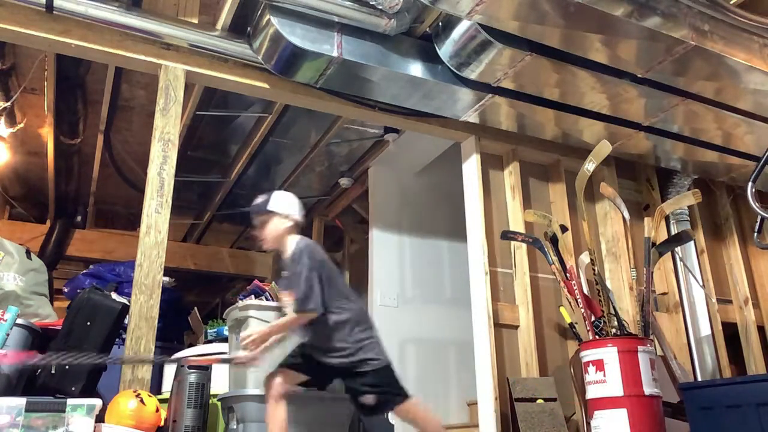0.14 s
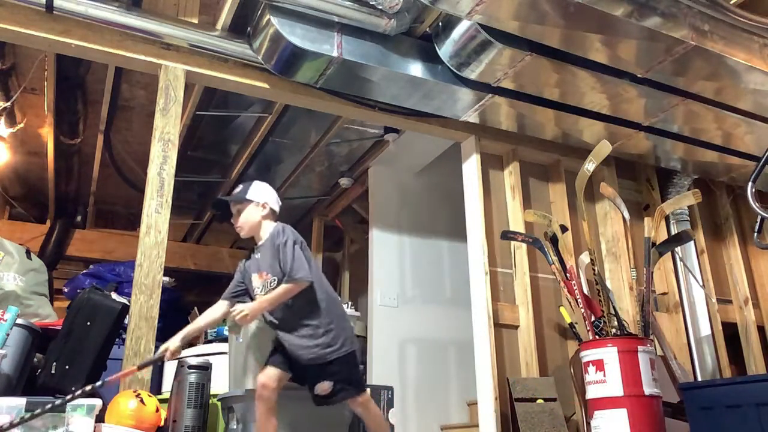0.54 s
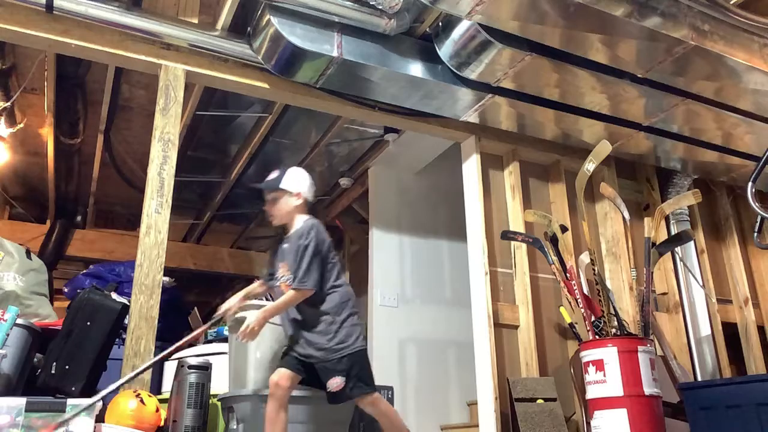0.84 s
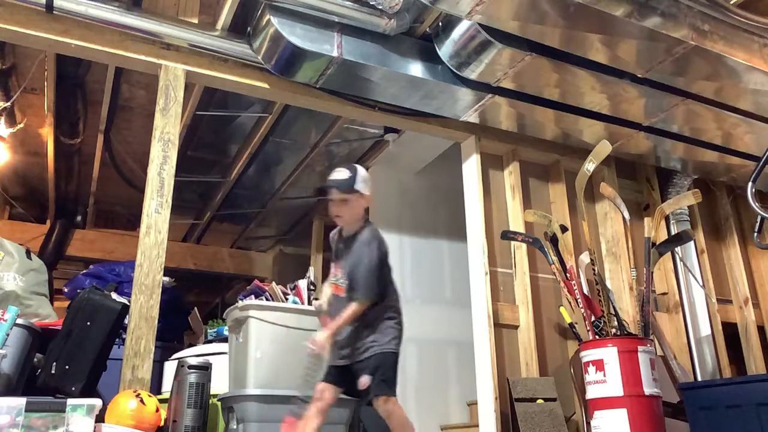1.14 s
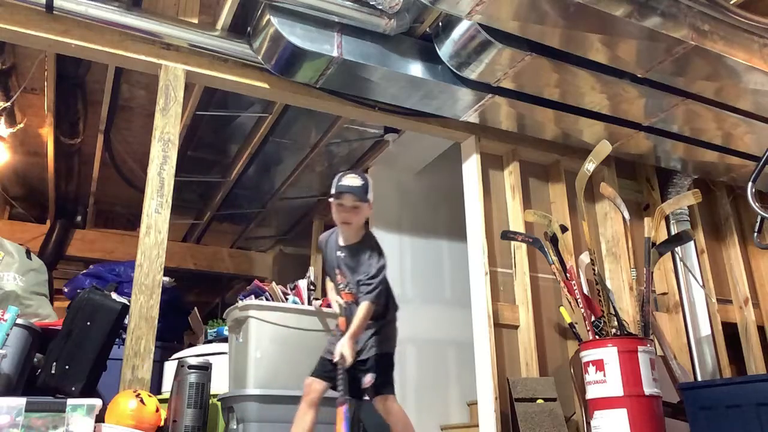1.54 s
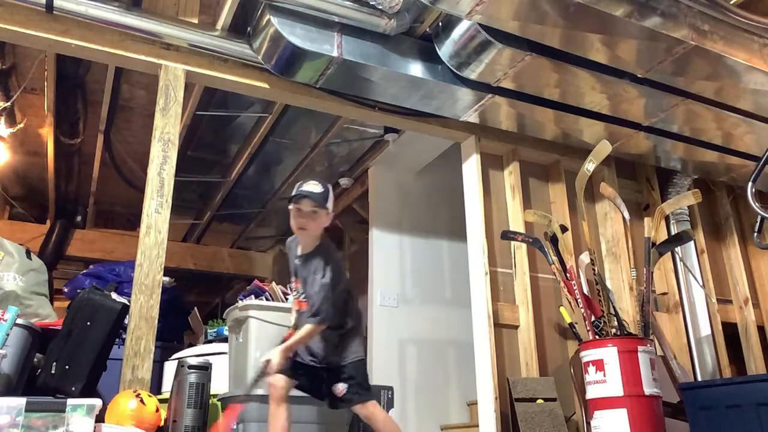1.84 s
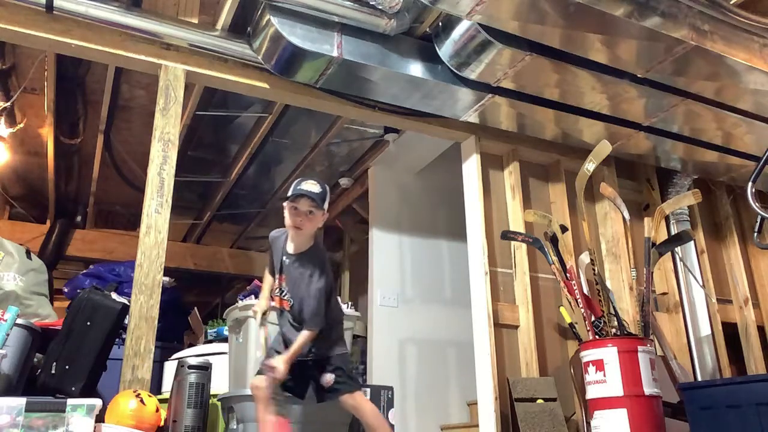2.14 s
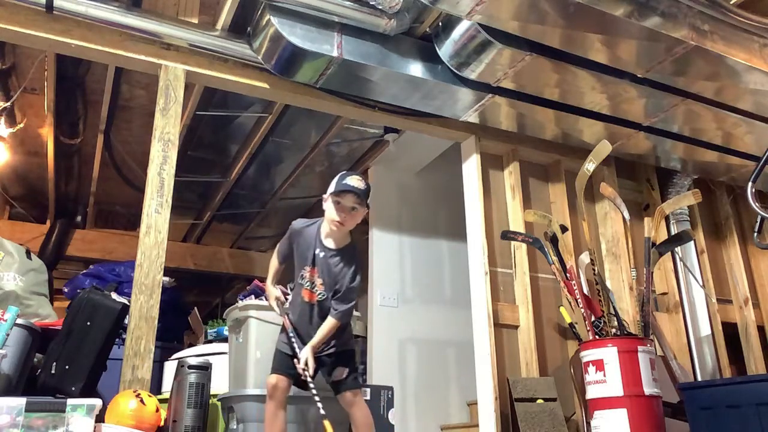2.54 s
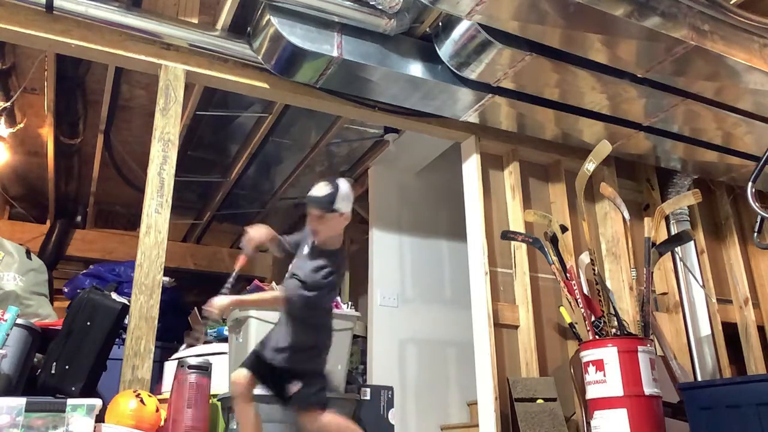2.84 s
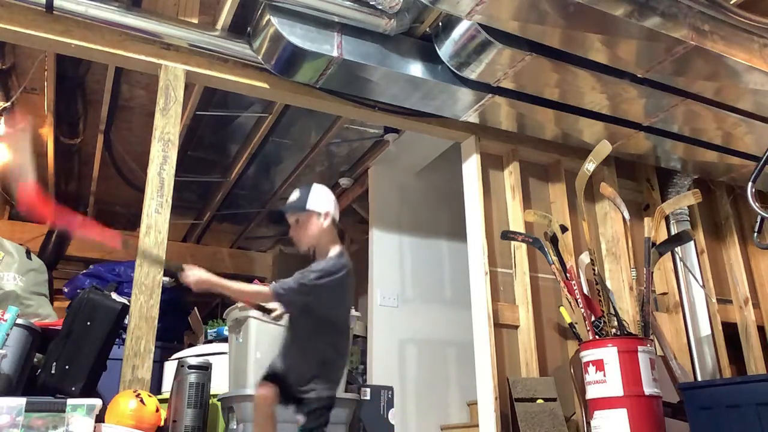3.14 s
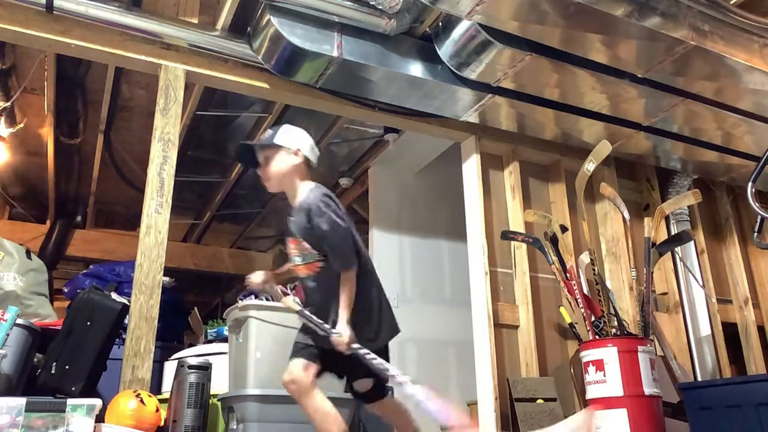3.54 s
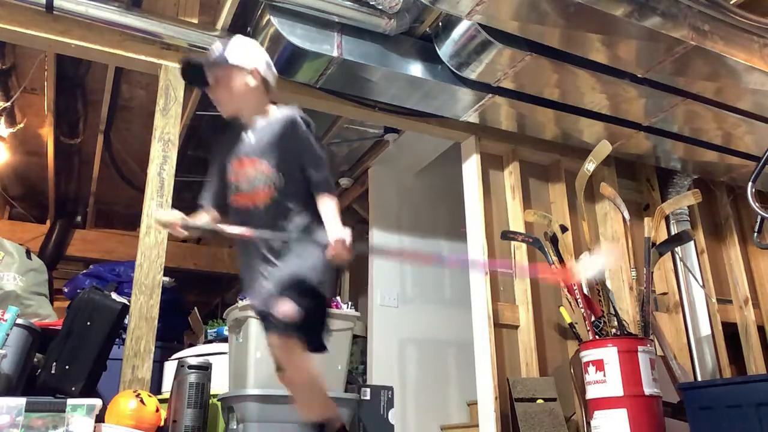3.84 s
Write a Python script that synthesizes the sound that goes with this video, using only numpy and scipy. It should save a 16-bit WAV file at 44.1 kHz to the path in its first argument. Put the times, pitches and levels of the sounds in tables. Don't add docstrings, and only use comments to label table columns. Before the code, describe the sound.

A hockey stick slaps a puck on a concrete floor, close up, with small taps and shoe scuffs between; later one hard shot cracks and rings a metal post. Bright short echoes, faint hum.

```python
import sys
import numpy as np
from scipy import signal
from scipy.io import wavfile
from scipy.ndimage import uniform_filter1d, minimum_filter1d

SR = 44100
rng = np.random.default_rng(int(sys.argv[2]) if len(sys.argv) > 2 else 0)


def gain_from_db(level_db):
    decades = np.asarray(level_db, float) / 20
    return 10 ** decades


def to_wav(sig):
    pcm = np.clip(np.atleast_2d(sig), -1, 1) * 32767
    pcm = np.round(pcm).astype(np.int16)
    wavfile.write(sys.argv[1], SR, pcm.T)


N = 176400
TAIL = 30000


def evened(x):
    return x / np.sqrt(np.mean(x ** 2) + 1e-20)


def read(points, hz):
    f, value = np.transpose(points)
    return np.interp(np.log(hz + 1), np.log(f + 1), value)


def add(mix, start_s, sound):
    part = mix[round(start_s * SR):][:len(sound)]
    part += sound[:len(part)]


def tilt(hz, bright_db):
    pivot_hz = 3300
    return bright_db * np.tanh(2 * np.log2((hz + 1) / pivot_hz))


def colour(points, bright_db):
    hz = np.fft.rfftfreq(2048, 1 / SR)
    log_gain = np.log(gain_from_db(np.maximum(read(points, hz) + tilt(hz, bright_db), -90)))
    mirrored = np.r_[log_gain, log_gain[-2:0:-1]]
    h = np.fft.ifft(np.exp(np.conj(signal.hilbert(mirrored)))).real[:1024]
    return h / np.linalg.norm(h)


def rings(modes, scatter_db):
    t = np.arange(TAIL) / SR
    total = np.zeros(TAIL)
    for mode_hz, mode_db, t60_s in modes:
        level_luck, pitch_luck = rng.random(2)
        decay = gain_from_db(mode_db + scatter_db * (2 * level_luck - 1) - 60 * t / t60_s)
        sung_hz = mode_hz * (1 + 0.0056 * (pitch_luck - .5))
        total += decay * np.sin(2 * np.pi * sung_hz * t)
    return total


def house_air():
    # pitch_hz, level_db (per Hz)
    air_curve = [(15, -46), (25, -37), (123, 2), (451, -4.5), (531, -8), (1890, -21), (5000, -18.5),
                 (6560, -13.5), (16000, -27.5)]
    # pitch_hz, level_db
    hum_tones = [(120, -58)]
    air_db, patch_db, top_hz = -51, 2.5, 9000
    frames, hz, t = N // 512 + 5, np.fft.rfftfreq(2048, 1 / SR), np.arange(N) / SR
    a, b, patches = rng.standard_normal((frames, 1025, 3)).T
    patches = uniform_filter1d(uniform_filter1d(patches, size=10, axis=0), size=6, axis=1)
    gain = gain_from_db(read(air_curve, hz)[:, None] + patch_db * evened(patches))
    z = (a + 1j * b) * gain / (1 + (hz[:, None] / top_hz) ** 6)
    hiss = signal.istft(z, nperseg=2048, noverlap=1536)[1][:N]
    hum = sum(gain_from_db(tone_db + 1) * np.sin(2 * np.pi * tone_hz * t) for tone_hz, tone_db in hum_tones)
    return gain_from_db(air_db) * evened(hiss) + hum


def fan_drone():
    drone_hz, width_hz, drone_db = 63, 9.8, -63
    slow = signal.lfilter(*signal.butter(2, width_hz, fs=SR), rng.standard_normal((2, N)))
    carrier = np.exp(2j * np.pi * drone_hz * np.arange(N) / SR)
    return gain_from_db(drone_db) * evened(((slow[0] + 1j * slow[1]) * carrier).real)


def garage():
    # pitch_hz, t60_s
    room_decay = [(200, 0.47), (1000, 1), (3000, 0.85), (6500, 0.74), (12000, 0.5)]
    build_s, early_db, early_t60_s = 0.0032, 7, 0.47
    wall_s, wall_db, wall_bright_db = .019, 7, 6
    wall_spread_s, wall_stop_s = .004, .002
    lumps_db = 1.5
    hz, times, z = signal.stft(rng.standard_normal((2, TAIL)), SR, nperseg=256)
    z[0] *= gain_from_db(-60 * times / read(room_decay, hz)[:, None])
    z[1] *= gain_from_db(tilt(hz, wall_bright_db))[:, None]
    tail, burst = signal.istft(z, SR, nperseg=256)[1][:, :TAIL]

    t = np.arange(TAIL) / SR
    tail = tail * (1 - np.exp(-t / build_s)) * (1 + gain_from_db(early_db - 60 * t / early_t60_s))
    spread = np.where(t < wall_s, wall_spread_s, wall_stop_s)
    swell = np.exp(-.5 * ((t - wall_s) / spread) ** 2)
    h = tail + gain_from_db(wall_db) * burst * swell
    lumps = evened(uniform_filter1d(rng.standard_normal(TAIL), size=90))
    h = h * gain_from_db(lumps_db * lumps)
    return h / np.linalg.norm(h)


def footfall(level_db, pitch_hz):
    t60_s, rise_s, trim_db = 0.27, 0.0044, -9
    t = np.arange(TAIL // 2) / SR
    band = signal.butter(1, [pitch_hz * 0.55, pitch_hz * 0.86], "band", fs=SR)
    low = signal.lfilter(*band, rng.standard_normal(len(t)))
    return gain_from_db(level_db + trim_db - 60 * t / t60_s) * (1 - np.exp(-t / rise_s)) * evened(low)


def scuff(rise_s, fall_s, level_db, bright_db):
    # pitch_hz, level_db (per Hz)
    grit_curve = [(180, -23), (300, -7), (337, -21), (447, -11), (1390, -10), (3080, -9.5), (5800, -6),
                  (6520, -3.5), (16000, -29)]
    t = np.arange(TAIL) / SR
    swell = np.sin(np.pi / 2 * t / rise_s) ** 2
    stroke = np.where(t < rise_s, swell, gain_from_db(-20 * (t - rise_s) / fall_s))
    grain_size = gain_from_db(2 * np.minimum(rng.exponential(1, TAIL), 4))
    grit = rng.standard_normal(TAIL) * grain_size * (rng.random(TAIL) < .5)
    judder = gain_from_db(2.47 * evened(uniform_filter1d(rng.standard_normal(TAIL), size=500)))
    rub = evened(grit) * stroke * judder
    return gain_from_db(level_db) * signal.fftconvolve(rub, colour(grit_curve, bright_db))


def post():
    # pitch_hz, level_db, t60_s
    post_modes = [(225, -38, .8), (2262, -25, .3), (2255, -33, 1.4), (2279, -36, 1.2), (3580, -40, 1.),
                  (6200, -34, .9), (6255, -33, .9), (6345, -33, .9), (6520, -34, .8), (6680, -34, .8),
                  (6960, -35, .8)]
    held_s, flutter_db = .44, 2.5
    t = np.arange(TAIL) / SR
    flutter = uniform_filter1d(uniform_filter1d(rng.standard_normal(TAIL), size=500), size=500)
    damping_db = 400 * np.maximum(t - held_s, 0)
    return rings(post_modes, 0) * gain_from_db(flutter_db * evened(flutter) - damping_db)


def knock(level_db, bright_db, ring_db, direct_db, thud_hz=670):
    # pitch_hz, level_db (per Hz)
    click_curve = [(59, -70), (100, -39), (970, -18), (1610, -13), (2320, -9.5), (2470, -6.5), (3700, 3.5),
                   (6840, 11.5), (16000, -27.5)]
    # pitch_hz, level_db, t60_s
    shaft_modes = [(550, -11, .15), (830, -10, .08), (1314, -6, .1), (1640, -1, .1), (2060, -2, .12),
                   (2490, -2, .09), (2960, -3, .07), (3450, -8, .09), (4080, -8, .09), (4550, -8, .07)]
    thud_db, thud_t60_s = -22, 0.033
    t = np.arange(TAIL) / SR
    ring = rings(shaft_modes, 3)
    ring = gain_from_db(ring_db) * ring / np.linalg.norm(ring)
    thud = np.sin(2 * np.pi * thud_hz * t) * gain_from_db(-60 * t / thud_t60_s)
    body = ring + gain_from_db(thud_db - bright_db / 2) * thud / np.linalg.norm(thud)
    near = 0.8 * body
    add(body, 0, colour(click_curve, bright_db))
    out = signal.fftconvolve(body, garage())

    click = gain_from_db(direct_db) * colour(click_curve, bright_db - 10)
    add(out, 0, near)
    add(out, 0, click)
    for delay_luck, sign_luck in rng.random((4, 2)):
        rebound = 0.5 * (1 - 0.3 * delay_luck) * np.sign(sign_luck - .5)
        add(out, 0.00099 + .008 * delay_luck, rebound * click)
    return gain_from_db(level_db) * signal.lfilter(*signal.butter(2, 200, "high", fs=SR), out)


def scene():
    # start_s, level_db, pitch_hz
    footfalls = [
        (0.017, -50, 157),
        (0.06, -49, 115),
        (0.431, -38, 170),
        (1.198, -42, 172),
        (2.048, -28.5, 186),
        (2.217, -20.5, 316),
        (3.239, -26, 200),
        (3.498, -29, 135),
        (3.6, -40, 135),
        (3.898, -37, 68),
    ]
    # start_s, rise_s, fall_s, level_db, bright_db
    scuffs = [(.04, 0.18, 0.16, -49, 10), (.395, 0.0043, 0.06, -31.5, -5.5), (0.598, 0.14, 0.9, -38.5, 0),
              (0.999, 0.13, 0.17, -67, 9), (1.52, 0.33, 0.032, -34, 0), (2.548, 0.12, 0.45, -37.5, 3),
              (2.79, 0.056, 0.11, -29.5, 2), (3.168, 0.15, 0.11, -37, -6), (3.299, 0.22, 0.18, -36, -2.5),
              (3.55, 0.024, 0.071, -61, -3), (3.87, 0.063, 0.83, -46, 5.5)]
    # start_s, level_db, bright_db, ring_db, direct_db
    taps = [(0.619, -21, -9.5, -23, -21), (0.734, -11.5, -3, -14, -14), (0.746, -18, -6, -14, 4),
            (0.828, -17.5, -31, -1, -2), (0.851, -17.5, -15, -22, -11), (0.894, -10.5, 3, -15, -10),
            (0.992, -30, 21, -20, 2), (1.066, -23, -6, -4.5, -4), (1.12, -32, -5.5, -16.5, -8),
            (2.744, -13.5, -16, -14, -20), (3.079, -56, 0, -1, -17), (3.167, -23, -16, -5, -38),
            (3.178, -14, -8.5, -6.5, -20), (3.664, -20.5, -12, -14, -19), (3.673, -19.5, -14, -11, -16),
            (3.874, -26, -21, -18, -19), (3.892, -34.5, 9, -16, 0.5)]
    # start_s, level_db, bright_db, ring_db, direct_db
    slaps = [
        (0.404, 1, -12, -3.5, -9),
        (0.718, -5, -20, -10, -8),
        (1.19, 8, -10.5, -9.5, -7),
        (1.755, -6, -9, -20, -4.5),
        (1.993, 5.5, -11, -10, -15),
        (2.046, 0.5, 5.5, -34, -9),
        (2.2233, 8, -10.5, -23, -10.5),
        (3.219, 5.5, -4, -15.5, -13.5),
    ]
    slap_thuds = [570, 922, 624, 638, 820, 490, 365, 832]
    tap_trim_db, slap_trim_db = 12, 14

    out = house_air() + fan_drone()
    for start_s, *rest in footfalls:
        add(out, start_s, footfall(*rest))

    rubs = np.zeros(N)
    for start_s, *rest in scuffs:
        add(rubs, start_s, scuff(*rest))
    add(rubs, 3.22, post())

    for start_s, level_db, *rest in taps:
        add(out, start_s, knock(level_db + tap_trim_db, *rest))
    for (start_s, level_db, *rest), thud_hz in zip(slaps, slap_thuds):
        add(out, start_s, knock(level_db + slap_trim_db, *rest, thud_hz))
    add(out, 3.2125, scuff(rise_s=.01, fall_s=.045, level_db=-10, bright_db=4))

    echoed = signal.fftconvolve(rubs, garage())[:N]
    return (out + 0.97 * rubs + 0.67 * echoed)[None]


def low_pass(x):
    return signal.sosfilt(signal.butter(12, 16480, fs=SR, output="sos"), x)


def record(dry):
    limit_db, ratio_share, recover_db_per_s = -3, .85, 3000
    low_cut = signal.butter(4, 50, "high", fs=SR, output="sos")
    x = signal.sosfilt(low_cut, dry)

    peak = -minimum_filter1d(-abs(x[0]), size=161)
    peak_db = 20 * np.log10(peak + 1e-9)
    fall_db = np.arange(N) * recover_db_per_s / SR
    held_peak_db = np.maximum.accumulate(peak_db + fall_db) - fall_db
    over_db = np.maximum(held_peak_db - limit_db, 0)
    held = x / gain_from_db(ratio_share * uniform_filter1d(over_db, size=121))

    top_hz = 15800
    edge = signal.firwin2(255, [0, top_hz - 150, top_hz + 150, SR / 2], [1, 1, .12, .12], fs=SR)
    return low_pass(signal.oaconvolve(held, edge[None], "same"))


dry = scene()
out = record(dry)
to_wav(out)
```